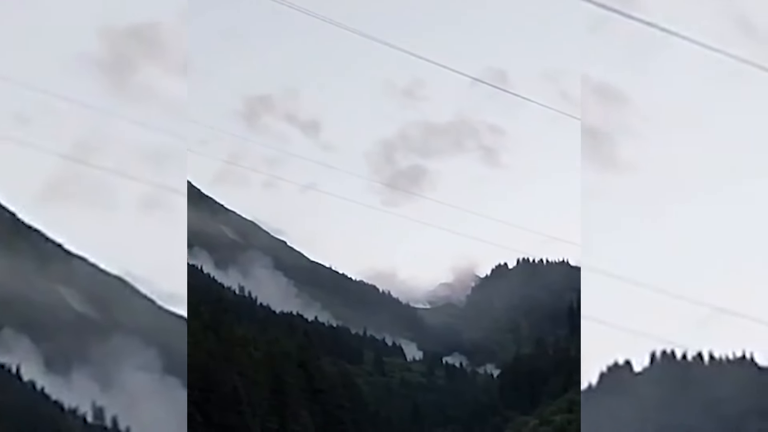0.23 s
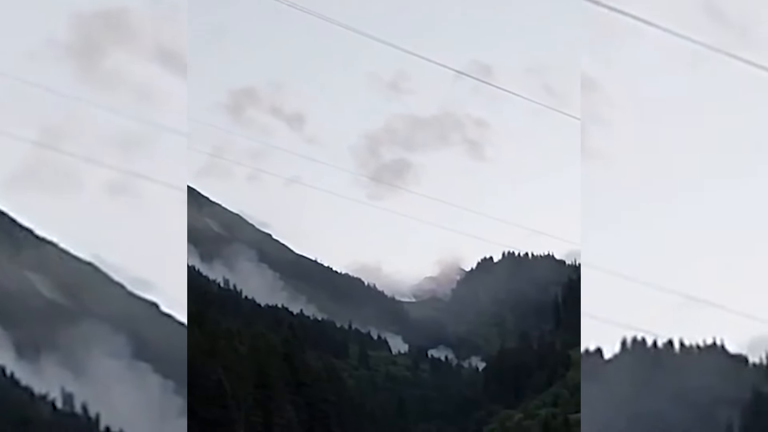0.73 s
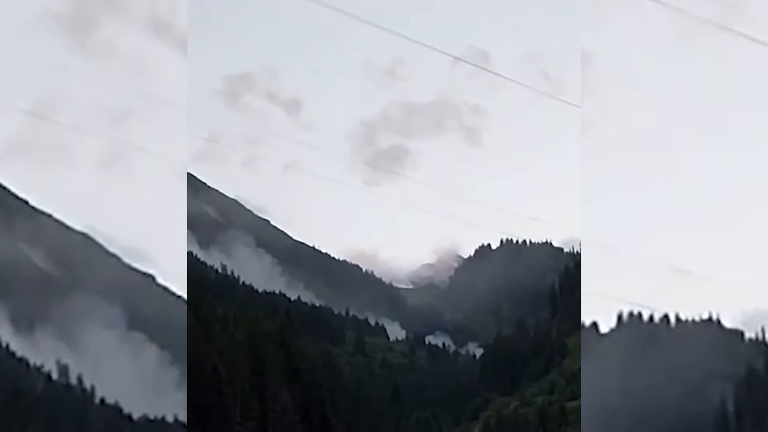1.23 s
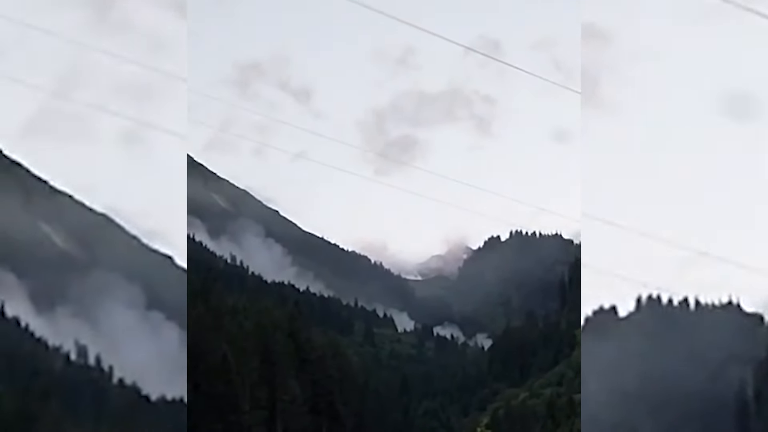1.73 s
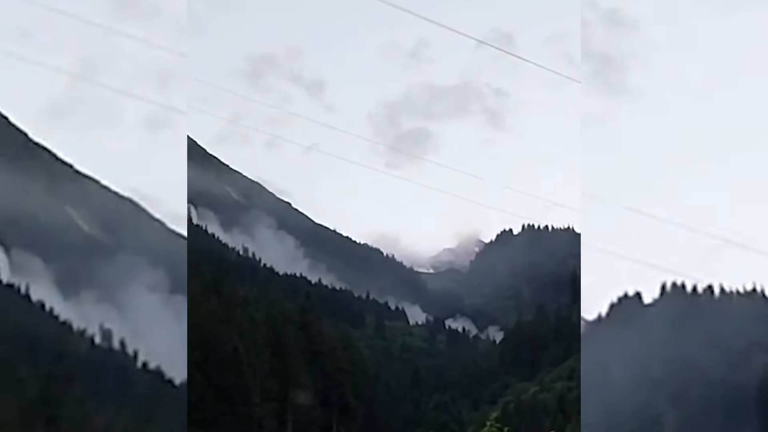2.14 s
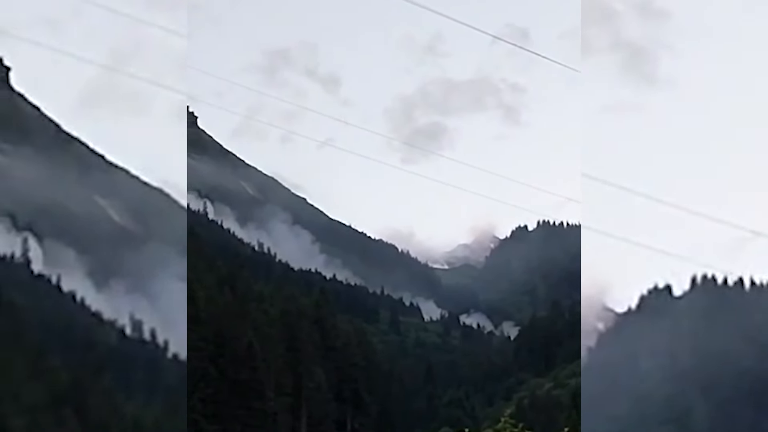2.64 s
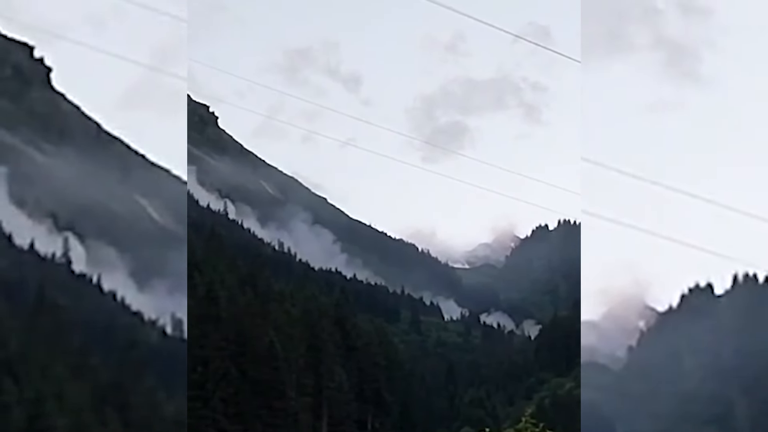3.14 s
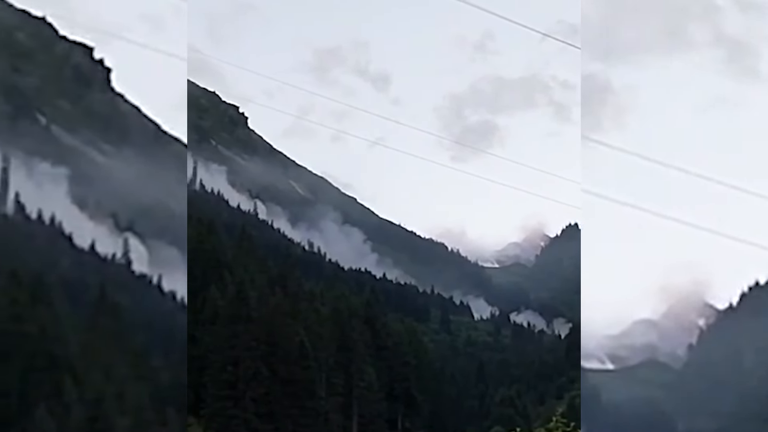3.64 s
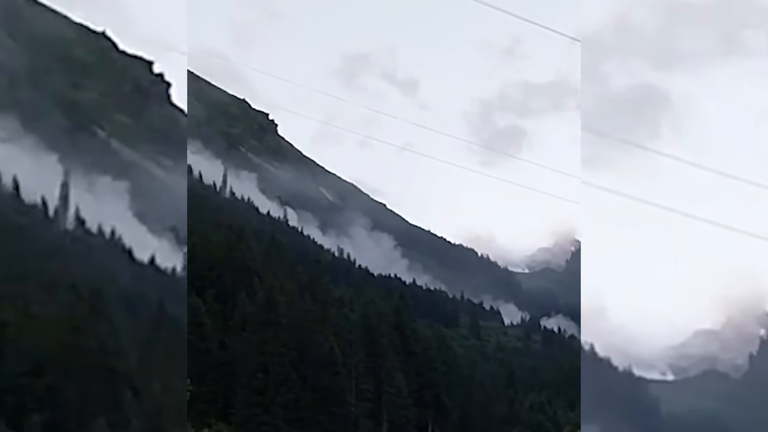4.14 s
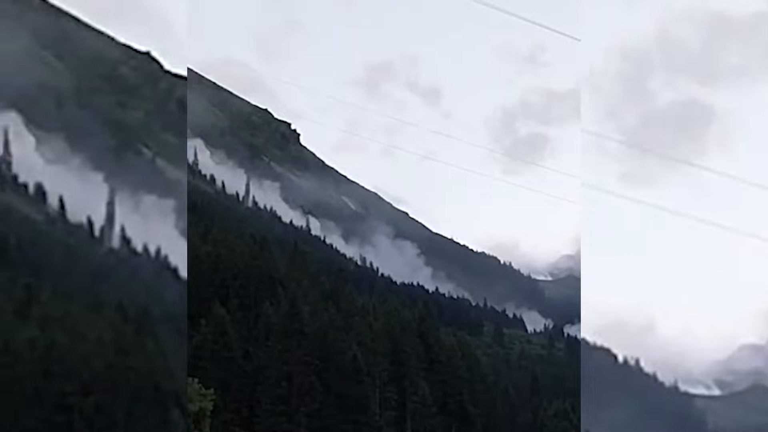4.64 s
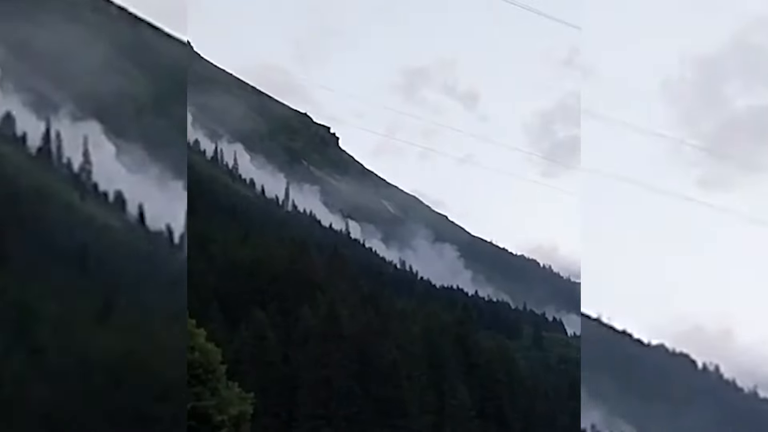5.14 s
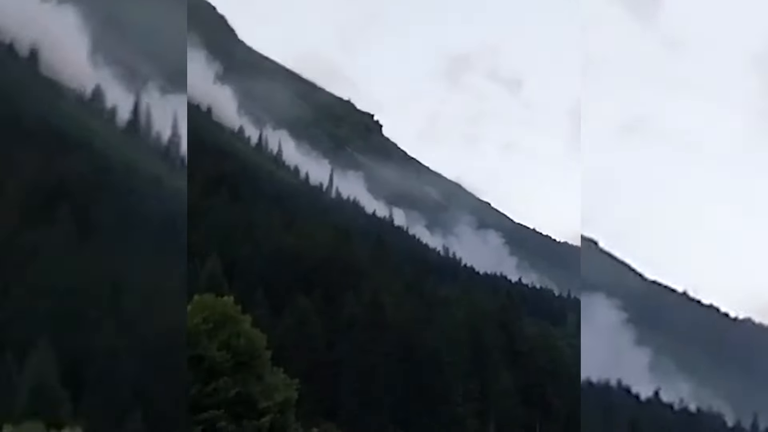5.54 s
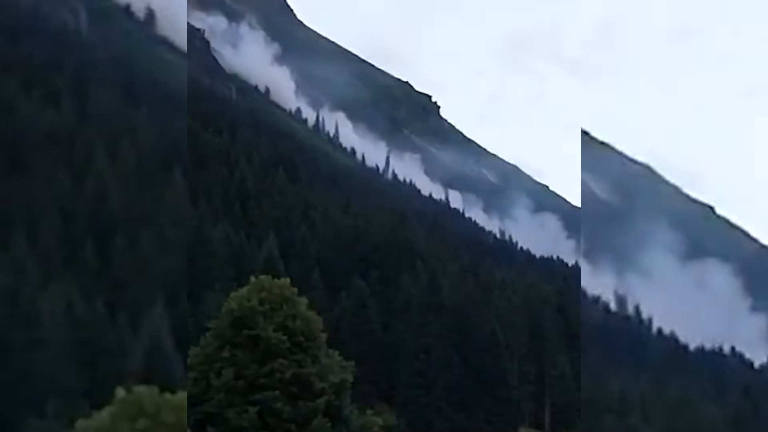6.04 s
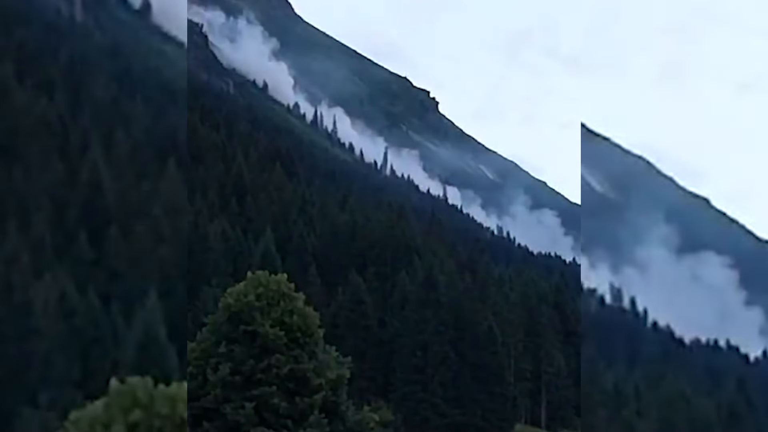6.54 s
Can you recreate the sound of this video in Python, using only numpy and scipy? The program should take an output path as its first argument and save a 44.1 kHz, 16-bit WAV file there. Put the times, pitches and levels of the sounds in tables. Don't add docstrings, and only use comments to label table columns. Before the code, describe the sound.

Open mountainside beside trees: a powerful low landslide rumble fills everything, swelling unevenly, with blurred booming boulder knocks through the ground. Occasional short rising bird chirps cut above it. The roar abruptly drops for about a second and a half, leaving weaker rumble, sparse thuds and clearer bird whistles, then returns abruptly and its loud passage repeats. Handheld two-port microphone, faint high hiss, tiny handling ticks and rubs.

```python
import sys
import numpy as np
from scipy import signal
from scipy.io import wavfile
from scipy.ndimage import uniform_filter1d

SR = 44100
rng = np.random.default_rng(int(sys.argv[2]) if len(sys.argv) > 2 else 0)


def log_audio(samples):
    frames = np.atleast_2d(samples).T
    limited = np.clip(frames, -1, 1)
    pcm = np.round(limited * 32767).astype(np.int16)
    wavfile.write(sys.argv[1], SR, pcm)


def ratio_of_db(decibels):
    return 10 ** (np.asarray(decibels, float) / 20)


N = 299439

CUTS = (32043, 124653, 190803)


def flow(layers_db, start, patchy_db):
    # (frequency [Hz], level [dB per Hz])
    slide_colour = [(22, -37), (58, -9), (80, -17), (175, -0.5), (245, -6.5), (320, -14), (660, -19),
                    (900, -26), (1600, -33.5), (2500, -43), (3300, -44.5), (3480, -42.5), (5000, -48),
                    (7500, -55.5)]
    # (top of ground shake [Hz], roar centre [Hz], tumbling centre [Hz], hiss centre [Hz])
    layer_hz = (100, 160, 700, 4200)
    # (time [s], surge [dB])
    surge = [(.73, -3), (1.0, 2), (1.11, -6), (1.17, -1), (1.55, -2), (1.7, 0.5), (1.8, -0.5), (1.9, 3.5),
             (2.15, -3), (2.43, 0.5), (2.64, 4.5), (2.82, -3.5), (3.1, 3.5), (3.7, 0), (3.76, 2),
             (3.92, -4.5), (4.2, 3.5), (4.32, 2.5)]
    # (shake [dB per dB], roar [dB per dB], tumbling [dB per dB], hiss [dB per dB])
    follow = (-0.19, 0.94, -0.13, .1)
    flow_db = -24.5

    hz = np.fft.rfftfreq(2048, 1 / SR)
    t = np.arange(N // 512 + 5) * 512 / SR
    t = np.maximum(t, start / SR)
    surge_db = np.interp(t, *np.transpose(surge))
    swell = np.outer(surge_db, follow) + layers_db + recorder_db(t)[:, None]
    field = np.array([np.interp(np.log(hz + 1), np.log(layer_hz), row) for row in swell]).T

    patches = rng.standard_normal(field.shape[::-1]).T
    patches = uniform_filter1d(patches, size=20, axis=0)
    patches = evened(uniform_filter1d(patches, size=6, axis=1))

    colour = read(slide_colour, hz) - 100 * (hz > 7900)
    colour = colour - 10 * np.log10(np.sum(ratio_of_db(2 * colour)))
    return ratio_of_db(flow_db) * port_noise(colour[:, None] + field + patchy_db * patches, hz, size=2048)


def thuds(rise_s):
    # (time [s], peak level [dB], pitch [Hz])
    blows = [(0.745, -17.5, 165.3), (0.779, -25, 142.7), (0.837, -16.5, 177), (0.942, -16.5, 185),
             (1.035, -17.5, 164.3), (1.1, -16.5, 187.4), (1.175, -30, 164.4), (1.312, -16, 170.5),
             (1.397, -17.5, 164.5), (1.633, -15, 215), (1.703, -14, 197.6), (1.763, -17, 254.4),
             (1.862, -13, 144.4), (1.916, -21, 167), (1.965, -15, 165.3), (2.014, -19, 150),
             (2.083, -15.5, 170.5), (2.122, -39, 186), (2.23, -16.5, 197), (2.407, -17, 144),
             (2.459, -15, 193), (2.593, -21.5, 187.6), (2.687, -21.5, 169), (2.756, -21, 220.8),
             (2.91, -28.5, 221), (3.377, -28.5, 210), (3.557, -19.5, 175.2), (3.803, -23, 214.6),
             (3.966, -26, 237), (4.202, -31, 154)]
    ring_s, ring_at_db = .09, -17
    ring_s_per_db = -.005

    out = np.zeros(N)
    t = np.arange(SR // 4) / SR
    phases = rng.random((len(blows), 1))
    for (s, db, hz), phase in zip(blows, phases):
        t60 = max(ring_s + ring_s_per_db * (db - ring_at_db), .03)
        shape = (1 - np.exp(-t / rise_s)) ** 2 * ratio_of_db(-60 * t / t60)
        ring = np.sin(2 * np.pi * (hz * t + phase))
        add(out, s - .009, ratio_of_db(db - 5.0) * shape / shape.max() * ring)
    return np.array([out * ratio_of_db(-0.4), np.roll(out, 6)])


def birds():
    # (start [s], length [s], level [dB], top pitch [Hz], left minus right [dB])
    chirps = [
        (.785, 0.052, -35, 5450, -7.5),
        (2.392, .064, -40.5, 5367, -6),
        (4.175, .054, -37.5, 5490, -8.5),
    ]
    whistles = [
        (2.885, .095, -56.5, 5050, .6),
        (3.345, .115, -51, 5040, 3),
        (3.915, .105, -50, 5080, -4),
    ]
    two_notes = [
        (1.035, .16, -53, 3700, 2.5),
        (1.86, 0.17, -55.5, 3690, 3.5),
        (2.788, 0.16, -48, 3696, 1.5),
        (3.555, .15, -53.5, 3690, 1.2),
    ]
    # (share of length [0-1], share of top pitch [0-1], level [dB])
    chirp_shape = [(0, .865, -24), (.3, .918, -11), (.6, .99, -1), (.74, 1, 0), (1, .955, -9)]
    whistle_shape = [(0, .925, -6), (.25, .997, -2), (.7, 1, 0), (1, .985, -3)]
    two_note_shape = [(0, .947, -8), (.25, .942, -3), (.5, .952, -3), (.6, .972, -7), (.74, 1, 0),
                      (.9, .995, -1.5), (1, .99, -7)]

    song = bird(chirps, chirp_shape, waver=0.011, second_db=-46)
    song = song + bird(whistles, whistle_shape, waver=0.014, second_db=-46)
    return song + bird(two_notes, two_note_shape, waver=0.0051, second_db=-37)


def bird(calls, shape, waver, second_db):
    out = np.zeros((2, N))
    share, pitch, shape_db = np.transpose(shape)
    for s, length, db, hz, pan_db in calls:
        u = np.arange(0, length, 1 / SR) / length
        u = u[:(CUTS[1] - round(s * SR)) % N]
        wobble = evened(uniform_filter1d(rng.standard_normal(SR // 4), size=150))[:len(u)]
        glide_hz = hz * np.interp(u, share, pitch) * (1 + waver * wobble)
        phase = 2 * np.pi * np.cumsum(glide_hz) / SR
        tone = np.sin(phase) + ratio_of_db(second_db) * np.sin(2 * phase)
        loudness = ratio_of_db(np.interp(u, share, shape_db) + db + 2.5)
        tone = tone * loudness * signal.windows.tukey(len(u), .15)
        add(out, s, tone * ratio_of_db([[pan_db / 2], [-pan_db / 2]]))
    return np.array([out[0], np.roll(out[1], 2)])


def trees(x, t60, wet_db, wall_s, wall_db):
    t = np.arange(SR // 2) / SR
    signs = rng.choice([-1., 1.], (2, len(t)))
    taps = signs * (rng.random((2, len(t))) < 1500 / SR)
    taps = taps * ratio_of_db(-60 * t / t60) * (t > .006)
    taps = ratio_of_db(wet_db) * taps / np.linalg.norm(taps, axis=1, keepdims=True)
    taps[0, round(wall_s * SR)] = ratio_of_db(wall_db)
    return x + signal.fftconvolve(x.mean(1, keepdims=True), taps[None], axes=2)[..., :N]


def fizz(flicker_db):
    # (frequency [Hz], level [dB per Hz])
    fizz_colour = [(7000, -35), (8000, -22.5), (9000, -2), (10000, -2), (11000, 3), (11600, -4),
                   (11900, -35), (16000, -51.5)]
    # (time [s], peak level [dB])
    ticks = [(1.062, -71), (1.4864, -61), (1.512, -62), (1.6265, -58), (1.761, -57.5), (1.8457, -60.5),
             (1.8937, -70.5), (2.1834, -60), (2.308, -64.5), (2.413, -58), (2.5627, -61), (2.5892, -62.5),
             (2.6156, -64)]
    # (time [s], width [s], rise [dB])
    rubs = [
        (.74, .12, 4.5),
        (1.56, .2, 3.5),
        (2.02, 0.19, 7.5),
        (2.45, .3, 1.5),
    ]
    fizz_db, tick_t60 = -77, .012

    hz = np.fft.rfftfreq(256, 1 / SR)
    t = np.arange(N // 64 + 5) * 64 / SR
    colour = read(fizz_colour, hz)
    colour = colour - 10 * np.log10(np.sum(ratio_of_db(2 * colour)))
    rub_db = sum(db * np.exp(-((t - s) / width) ** 2) for s, width, db in rubs)
    flicker = evened(uniform_filter1d(rng.standard_normal(len(t)), size=8))
    hiss_db = fizz_db + recorder_db(t) + rub_db + flicker_db * flicker
    puffs = np.zeros(len(t))
    for s, db in ticks:
        puffs += ratio_of_db(db - 1.5 - 60 * np.maximum(t - s, 0) / tick_t60) * (t >= s)
    total_db = 20 * np.log10(ratio_of_db(hiss_db) + puffs)
    return ratio_of_db(4.0) * port_noise(colour[:, None] + total_db, hz, size=256)


def port_noise(field_db, hz, size):
    # (frequency [Hz], likeness [0-1])
    likeness = [(60, 1), (200, 1), (300, 0.9), (500, 1), (900, 0.51), (1800, 0.1), (3500, 0.6), (7000, 0.3)]
    # (frequency [Hz], lead [radians])
    left_lead = [(0, 0), (170, .15), (600, .45), (860, .8), (1460, 1.3), (2240, 2.9), (4130, 4.8),
                 (7150, 8)]
    # (frequency [Hz], left minus right [dB])
    balance = [(60, -1), (100, -2), (170, -1), (290, -2.5), (500, -0.5), (840, -7), (1430, -7), (2420, 1),
               (4100, -6.5), (6960, -2.5)]

    a, b, c, d = rng.standard_normal((field_db.shape[1], len(hz), 4)).T
    same = np.clip(read(likeness, hz), 0, 1)[:, None]
    left = a + 1j * b
    delayed = left * np.exp(-1j * read(left_lead, hz))[:, None]
    right = same * delayed + np.sqrt(1 - same ** 2) * (c + 1j * d)
    lean = ratio_of_db(read(balance, hz) / 2)[:, None]
    z = np.array([left * lean, right / lean]) * ratio_of_db(field_db)
    return signal.istft(z, nperseg=size, noverlap=size - size // 4)[1][:, :N]


def recorder_db(t):
    duck_db, hold_s, recover_s = -5, 0.3, .5
    since = t - CUTS[1] / SR
    return duck_db * (since >= 0) * np.clip(1 - (since - hold_s) / recover_s, 0, 1)


def stretch(x, edges, ease_s=0.01, roar_hz=170):
    t = np.arange(x.shape[1]) / SR
    ease = np.cos(np.pi / 2 * np.minimum(t / ease_s, 1)) ** 2
    ease = ease * np.cos(2 * np.pi * roar_hz * t)
    start, end = np.reshape(edges, (2, 2, 1))
    return x + (start - x[:, :1]) * ease + (end - x[:, -1:]) * ease[::-1]


def evened(x):
    return x / np.sqrt(np.mean(x ** 2) + 1e-20)


def read(points, hz):
    f, value = np.transpose(points)
    return np.interp(np.log(hz + 1), np.log(f + 1), value)


def add(mix, s, sound):
    part = mix[..., round(s * SR):][..., :sound.shape[-1]]
    part += sound[..., :part.shape[-1]]


def scene():
    # (shake [dB], roar [dB], tumbling [dB], hiss [dB])
    loud_db = (1.5, -0.5, 1.12, 4)
    quiet_db = (-1.5, -12, -4, 4.5)
    cut_pressure = [
        (-.02, -.115, -.105, -.13),
        (0, 0, -.03, -.055),
    ]

    a, b, c = CUTS
    song = birds()
    late_song = song * (np.arange(N) >= b)
    echoes = trees(np.array([song, late_song]), t60=.35, wet_db=-4, wall_s=.033, wall_db=-6)
    near = echoes + thuds(rise_s=.016) + fizz(flicker_db=0.7)
    loud = flow(loud_db, a, patchy_db=0.99) + near[0]
    loud = stretch(loud[:, a:b], cut_pressure[0])
    quiet = flow(quiet_db, b, patchy_db=0.63) + near[1]
    quiet = stretch(quiet[:, b:c], cut_pressure[1])
    return np.hstack([loud[:, -a:], loud, quiet, loud, loud])[:, :N]


def roll_off(x):
    return signal.sosfilt(signal.butter(12, 15800, fs=SR, output="sos"), x)


def record(dry):
    n = np.arange(N)
    opening = .3 + n / 200
    closing = n[::-1] / 200
    mix = dry * np.minimum(np.minimum(closing, opening), 1)
    return roll_off(mix)


dry = scene()
out = record(dry)
log_audio(out)
```